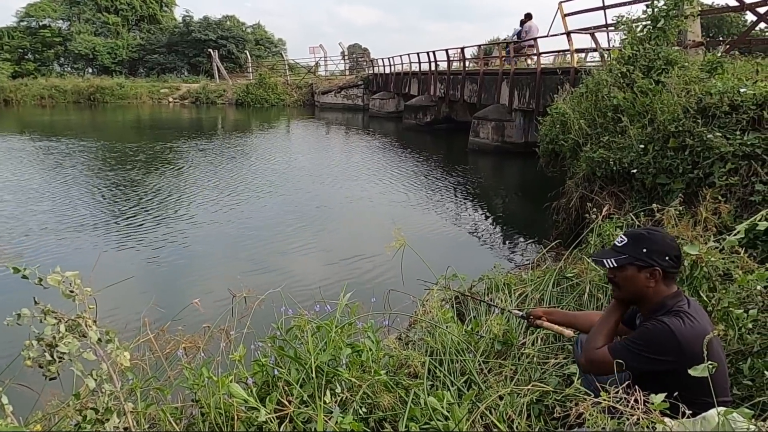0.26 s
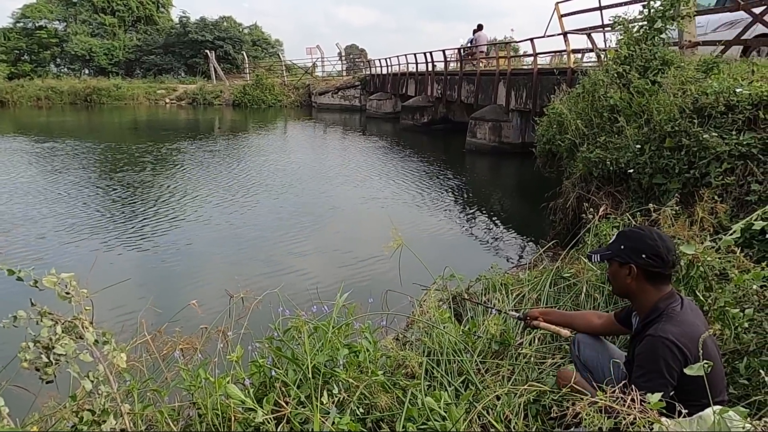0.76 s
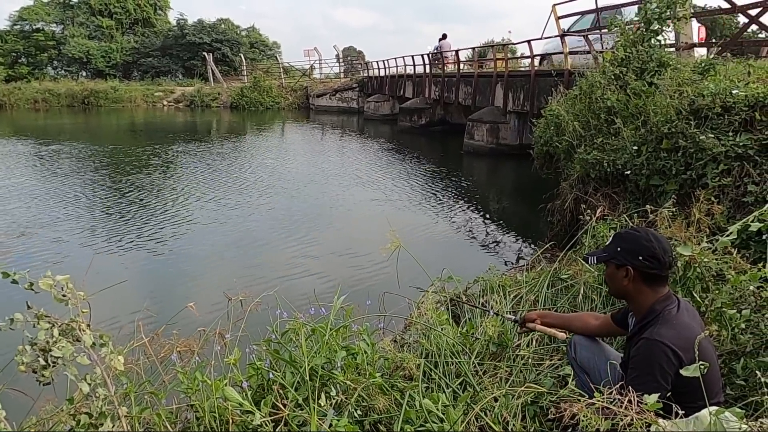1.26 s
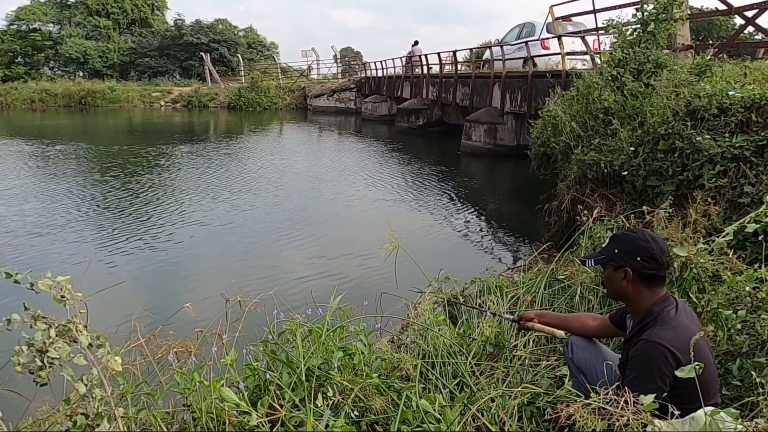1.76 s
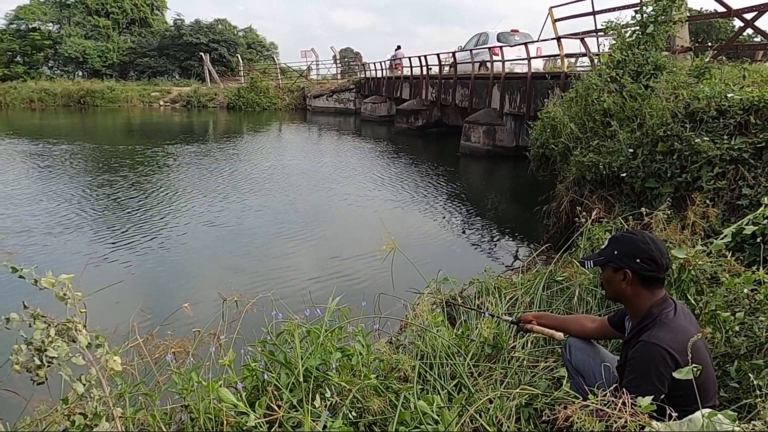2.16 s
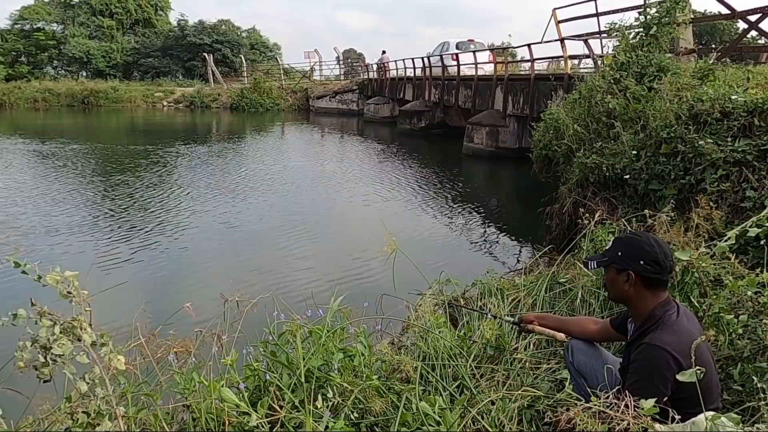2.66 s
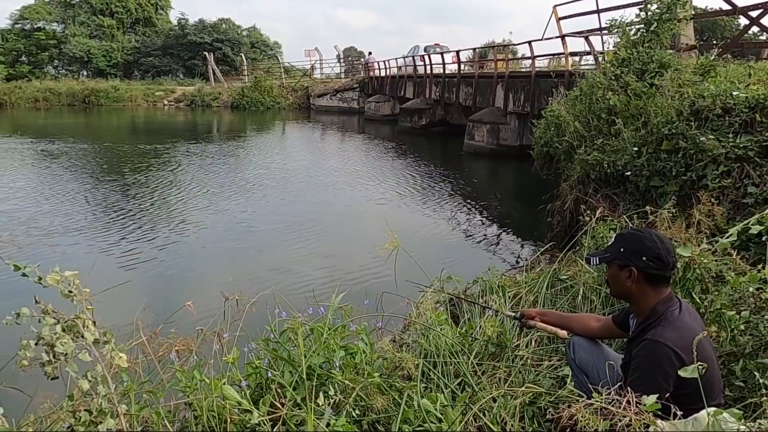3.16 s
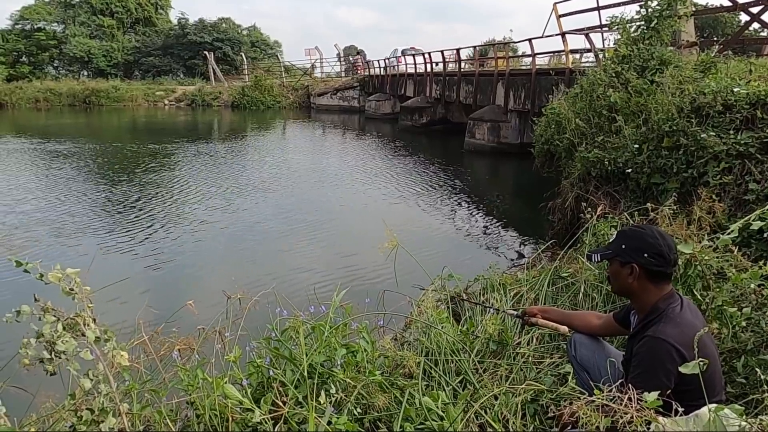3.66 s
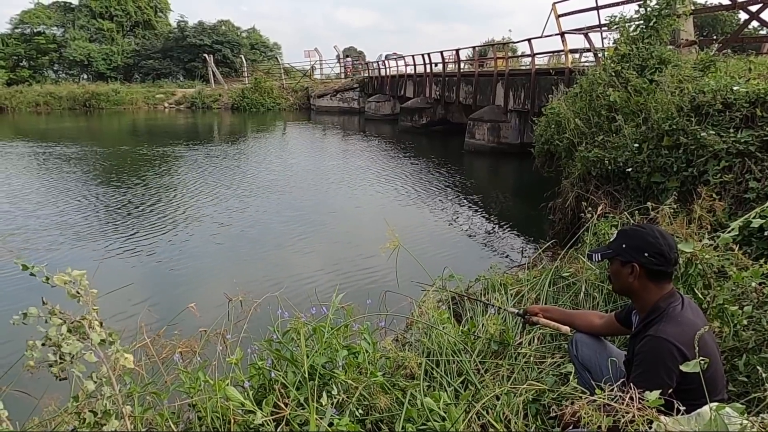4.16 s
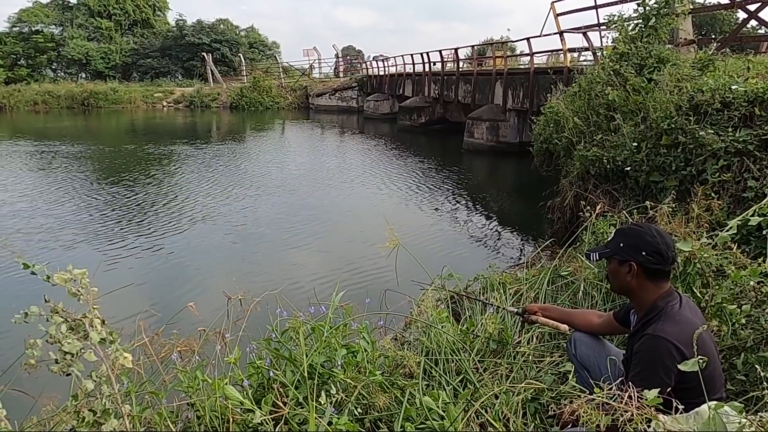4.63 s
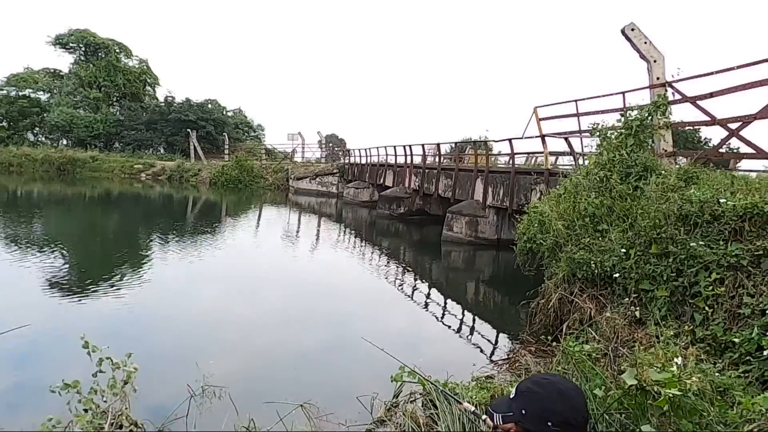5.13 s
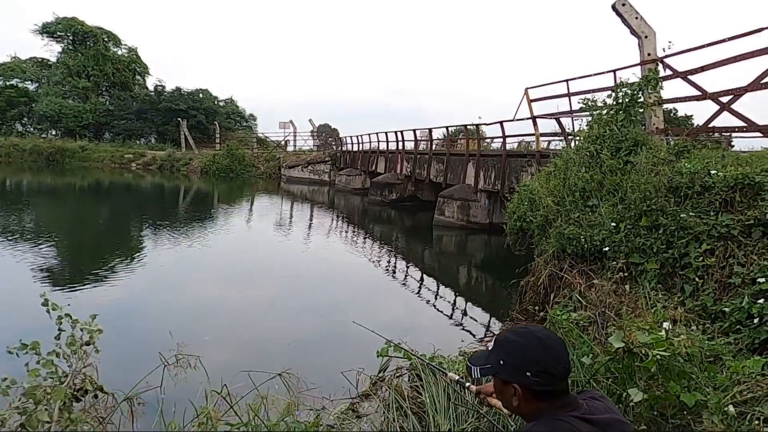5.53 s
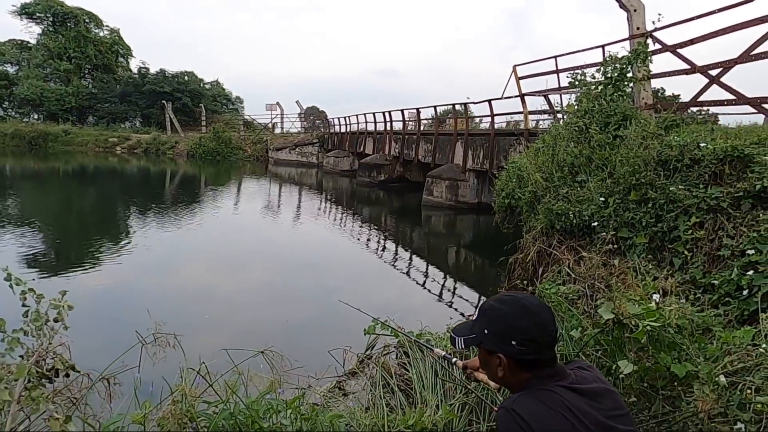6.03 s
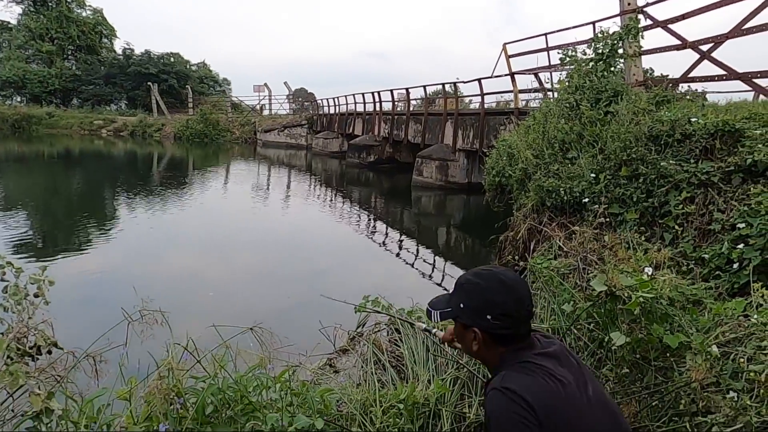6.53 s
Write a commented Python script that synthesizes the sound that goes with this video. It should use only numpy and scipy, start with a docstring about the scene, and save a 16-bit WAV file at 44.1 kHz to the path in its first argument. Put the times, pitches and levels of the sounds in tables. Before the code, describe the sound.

A motorbike and a car cross a bridge, wind buffets, then after a brief silence another motorbike thumps and slows amid small clicks.

```python
"""Traffic crosses a low bridge, heard from the grassy bank of a pond: a motorbike putters off on uneven
exhaust pulses, and a car booms up to speed behind it, its tyres roaring and singing on the deck.
Dry grass scrapes, and a gust buffets the microphone. After a short silence the scene
changes to a quieter bank: a single-cylinder bike thumps and throttles down among scraping crickets,
a far bird's trills and the clicks and rustle of fishing tackle."""
import sys
import numpy as np
from scipy import signal
from scipy.fft import rfft, irfft
from scipy.io import wavfile
from scipy.ndimage import uniform_filter1d

SR = 44100
rng = np.random.default_rng(int(sys.argv[2]) if len(sys.argv) > 2 else 0)


def put_to_file(sound):
    """Save the sound as 16-bit audio at rate SR, in the file named by the first command-line argument."""
    columns = np.atleast_2d(sound).T  # one column per channel
    safe = np.clip(columns, -1, 1)
    whole_steps = np.round(safe * 32767)
    wavfile.write(sys.argv[1], SR, whole_steps.astype(np.int16))


N = 299439
TIME = np.arange(N) / SR
BRIDGE_END_S, BANK_START_S, BANK_FULL_S, THROTTLE_SHUT_S = 4.981, 5.19, 5.28, 5.79

# Tone of the engines. Each row: frequency in Hz, level in dB.
BIKE_PIPE_EQ = [(20, -24), (50, -0.5), (80, -0.5), (105, 3), (130, -1), (156, 2), (200, -10), (235, -14.5),
                (280, -31), (340, -29), (700, -44.5), (3000, -87)]
BIKE_CLATTER_EQ = [(60, -10.5), (100, 0.5), (220, 0.5), (320, -14.5), (600, -9.5), (900, -12.5),
                   (1600, -12.5), (2100, -29.5), (3500, -22), (5000, -31.5), (9000, -35.5), (11500, -50),
                   (12600, -46), (16000, -62)]
CAR_PUFF_EQ = [(60, -18.5), (160, 6), (210, -5.5), (250, -7), (320, -18.5), (480, -8.5), (800, -24),
               (3000, -62)]
OPEN_THROTTLE_EQ = [(15, -40), (45, -3.5), (80, 0.5), (135, 3), (175, -7.5), (215, 0.5), (265, -16.5),
                    (315, -3), (390, -32), (700, -40), (2000, -80.5), (6000, -100)]
SHUT_THROTTLE_EQ = [(15, -21.5), (32, -2), (55, 4), (120, -3), (170, -8), (215, -14), (300, -23),
                    (420, -39.5), (700, -46), (2000, -74), (6000, -100)]
# The car's revs. Each row: time in seconds, firings per second, boom in dB, its octave in dB.
CAR_REVS = [(0, 28.5, -37, -35), (.8, 29.9, -36.5, -37), (1.24, 30.3, -37, -44), (1.32, 36.3, -32, -37),
            (1.42, 39.7, -27.5, -37.5), (1.58, 43, -24.5, -31), (1.96, 44.6, -24.5, -28),
            (2.2, 46.2, -24.5, -35), (2.36, 45, -28.5, -30.5), (2.44, 40, -31.5, -39),
            (2.68, 40, -29.5, -36.5), (2.83, 39.5, -42.5, -43), (3.0, 39.4, -38, -37.5),
            (3.5, 42, -32, -34), (3.98, 45.2, -32.5, -40), (4.22, 47, -37, -38.5), (4.5, 44.5, -30.5, -41),
            (4.7, 45.5, -37, -49), (4.98, 46, -38, -44.5)]
# Its overtones at the lowest revs. Each row: harmonic number, level in dB against the octave.
CAR_OVERTONES = [(3, -2), (4, -12), (5, -9.5), (6, -11)]
# Tone of the tyres and the traffic bed. Each row: frequency in Hz, level in dB.
ROAR_EQ = [(150, -7.5), (300, -2.5), (450, 4), (650, -2), (850, -4.5), (1200, -5.5), (1700, -9),
           (2500, -13.5), (3500, -19), (6000, -45.5), (12000, -69)]
RASP_EQ = [(600, -26.5), (1300, -9.5), (1750, -1), (1950, -4.5), (2200, 5), (2420, -7), (2650, 0),
           (3000, -11.5), (3600, -6), (5000, -18), (9000, -42)]
RUSH_EQ = [(600, -28), (880, 5), (1150, 4), (1350, -9), (1650, 1), (1950, -20), (4000, -44)]
HISS_EQ = [(1000, -15), (2500, -13), (3800, 1), (5200, -1), (6800, -11), (8700, -8), (9800, -18),
           (11000, -31), (13200, -33.5), (16000, -46.5)]
RUMBLE_EQ = [(10, -9.5), (28, 0.5), (55, 4.5), (100, -4.5), (180, -11.5), (250, -18), (400, -38.5),
             (1000, -67.5), (5000, -100)]
# Hollow, boxy resonances that colour the tyre roar.
# Each row: centre in Hz, width in Hz, boost or cut in dB at depth 1.
HOLLOW_BANDS = [(481, 21, 4.5), (780, 138, -6.5), (996, 73, 5), (1602, 58, 4.5), (1890, 99, -2),
                (2150, 46, 1.5), (327, 101, -6.5)]
# They deepen partway through the pass. Each row: time in seconds, depth as a factor.
HOLLOW_DEPTH = [(0, 0.23), (2.4, 0.9), (2.7, 1.28), (4.98, 0.95)]
# The tread's song. Each row: time in seconds, pitch in Hz, level in dB.
TREAD_SONG = [(0, 995, -56), (.35, 989, -70), (.55, 956, -54), (.85, 975, -50), (1.15, 996, -61),
              (1.45, 1002, -50.5), (1.9, 1007, -53.5), (2.55, 1038, -53.5), (2.7, 1085, -48),
              (2.85, 1060, -53), (3.3, 1040, -50.5), (3.7, 1016, -55), (4.28, 1020, -56),
              (4.38, 1040, -54.5), (4.5, 1010, -60), (4.98, 1000, -60)]
# Swells of tyre rasp, grass and handling. Each row: middle in seconds, width in seconds, level in dB.
RASP_SWELLS = [(1.6, 0.26, -58.5), (2.15, 0.2, -56), (4.7, 0.2, -60.5)]
GRASS_SWELLS = [(1.205, .015, -59), (2.69, .012, -58.5), (2.768, .014, -60), (3.219, .003, -56),
                (4.587, 0.0039, -54)]
RUSTLE_SWELLS = [(5.28, 0.033, -56.5), (5.333, 0.0092, -60), (6.672, 0.0088, -56.5), (6.735, 0.029, -55)]
# Tone of the sounds on the bank. Each row: frequency in Hz, level in dB.
GRASS_EQ = [(1500, -19), (2800, 0), (3600, 3.5), (4300, -2), (5100, 1), (6000, -12), (7200, -17),
            (9000, -26), (12000, -45)]
BREEZE_EQ = [(10, -8.5), (30, 7), (55, -3), (100, -7), (180, -21.5), (300, -31), (1000, -78.5)]
BANK_EQ = [(15, -21.5), (45, -0.5), (120, 7), (220, -6), (320, -16.5), (400, -16.5), (500, -15), (750, -24),
           (1100, -29.5), (1500, -32.5), (2200, -39), (3300, -48), (4500, -49), (9000, -63.5),
           (16000, -100.5)]
CLICK_EQ = [(300, -8), (900, -1), (1600, 2), (2300, 2.5), (2900, -2), (3900, 6.5), (4800, -5), (6000, -2.5),
            (8000, -18), (10000, -25), (12000, -49), (16000, -62)]
RUSTLE_EQ = [(300, -13), (800, -6), (1600, 0.5), (2600, -1.5), (4000, -2), (5500, -7), (8000, -9),
             (10000, -19.5), (12000, -32), (16000, -43)]
INSECT_EQ = [(3000, -30.5), (4700, -11), (5400, -10.5), (6300, 6), (7200, 4.5), (7900, -11),
             (8600, -4.5), (10000, -30.5), (15000, -37.5)]
# Wind hitting the microphone. Each row: middle in seconds, length in seconds, level in dB,
# eddy frequency in Hz, share at the right port from 0 to 1.
WIND_PUFFS = [(2.429, 0.042, -34.5, 70, 0.3), (2.563, 0.06, -34.5, 131, 0.26),
              (2.879, 0.077, -31.5, 119.9, 0.37), (2.945, .11, -29, 50, 0.47),
              (3.539, 0.091, -26.5, 48.13, 0.28), (3.639, .16, -29.5, 65, 0.7), (3.79, 0.086, -34, 65, 0.3),
              (4.241, .09, -33, 70, 0.8), (4.324, 0.036, -24, 91.2, 0.1), (4.338, 0.013, -23, 337, 1),
              (4.346, 0.04, -18, 65.8, 0.99), (4.362, .03, -18, 123, 0.8), (4.3806, 0.039, -15.5, 280, 1),
              (4.388, .018, -28.5, 420, 0.98), (4.403, .04, -22.5, 166, 1), (4.419, .028, -22, 114.3, 1),
              (4.44, 0.033, -27, 210, 1), (4.472, .05, -25, 190, 0.96), (4.495, .026, -27, 267, 0.99),
              (4.498, .028, -20, 90, 1), (4.538, .035, -28.5, 247, 0.99), (4.557, 0.07, -26.5, 112, 1),
              (4.961, 0.067, -30.5, 110.9, 0.6)]
# Slapback of the thumps. Each row: delay in seconds, its growth in seconds per second, level in dB.
THUMP_ECHOES = [(.003, 0.01386, -12.5), (0.0212, 0.00935, -12), (.037, .001, -10.5)]
# Cricket and bird calls. Each row: start in seconds, length in seconds, pitch in Hz, level in dB.
CRICKET_BOUTS = [(5.307, .35, 7470, -69.5), (5.655, .49, 7670, -78.5), (6.006, .77, 7460, -74)]
BIRD_TRILLS = [(5.428, 0.28, 4890, -73.5), (5.468, 0.2, 4540, -79), (5.99, 0.2, 4600, -81),
               (6.139, 0.25, 4920, -76), (6.562, 0.08, 4660, -78)]
# Knocks of tackle. Each row: start in seconds, crack peak in dB, crack T60 in seconds,
# ring pitch in Hz, ring level in dB, ring T60 in seconds.
TACKLE_CLICKS = [(5.232, -32, 0.006, 3430, -59, .02), (5.253, -45, .008, 4000, -62, .02),
                 (5.2703, -33.5, 0.038, 725, -31.5, 0.053), (5.282, -37, 0.013, 2900, -57, .04),
                 (5.286, -26.5, 0.017, 820, -31, 0.081), (5.311, -55, .02, 4530, -63, .04),
                 (5.334, -25.5, 0.018, 2260, -32, .038), (6.657, -36.5, 0.007, 5630, -66, .02),
                 (6.725, -48, 0.037, 1670, -50, 0.045), (6.746, -55, .04, 1280, -49, .05),
                 (6.761, -49, .006, 4100, -64, .03), (6.78, -55, 0.016, 2420, -50, .045)]
# Stereo image of the noise beds. Each row: frequency in Hz, left-right likeness from 0 to 1.
AIR_LIKENESS = [(60, 0.86), (120, 1), (260, 0.94), (530, 0.97), (1090, 0.93), (2250, 0.81), (4640, 0.6),
                (9580, 0.21)]
BREEZE_LIKENESS = [(20, 0.2), (300, 0.2)]
RUMBLE_LIKENESS = [(20, 0.85), (300, 1)]
# Stereo width of the bridge. Each row: time in seconds, side gain in dB.
BRIDGE_WIDTH = [(0, -39), (.3, -36), (.55, -17), (1.2, -7), (2.2, -1.5), (4.5, -0.5), (4.7, -11.5),
                (4.98, -12)]


def gain_of(db):
    """Decibels to amplitude."""
    return 10 ** (np.asarray(db) / 20)


def unit_rms(x):
    """Scales to rms 1."""
    return x / np.sqrt(np.mean(x ** 2) + 1e-20)


def at_hz(points, hz):
    """Reads a table along a log-frequency axis."""
    f, value = np.transpose(points)
    return np.interp(np.log(hz + 1), np.log(f + 1), value)


def curves(rows):
    """The columns of a time table, sample by sample."""
    s, *columns = np.transpose(rows)
    return [np.interp(TIME, s, c) for c in columns]


def bell(x, centre, width):
    """A smooth rise and fall of height 1."""
    return np.exp(-.5 * ((x - centre) / width) ** 2)


def swells(rows):
    """An envelope of bell-shaped swells."""
    return sum(gain_of(db) * bell(TIME, s, width) for s, width, db in rows)


def since(s):
    """Seconds gone by after time s, zero before it."""
    return np.maximum(TIME - s, 0)


def phase(hz):
    """The running angle of a moving pitch."""
    return 2 * np.pi * np.cumsum(hz) / SR


def add(mix, s, sound):
    """Lays a sound into the mix at time s."""
    part = mix[..., round(s * SR):][..., :sound.shape[-1]]
    part += sound[..., :part.shape[-1]]


def drift(rate_hz):
    """A smooth random wobble of rms 1."""
    lowpass = np.exp(-(np.fft.rfftfreq(N, 1 / SR) / rate_hz) ** 2)
    return unit_rms(irfft(rfft(rng.standard_normal(N)) * lowpass, N))


def impulse(eq, size=8192):
    """The minimum-phase impulse response of an EQ curve, peak 1."""
    log_gain = np.log(gain_of(at_hz(eq, abs(np.fft.fftfreq(size, 1 / SR)))))
    response = np.fft.ifft(np.exp(signal.hilbert(log_gain).conj())).real[:size // 2]
    return response / abs(response).max()


def through(x, response):
    """Convolution, cut to the scene's length."""
    return signal.oaconvolve(x, response)[:N]


def firings(turns):
    """One unit impulse at each whole turn."""
    return np.diff(np.floor(turns), prepend=np.floor(turns[0]))


def noise(eq, patchy_db, hollows=(), likeness=AIR_LIKENESS, size=1024):
    """Stereo noise of rms 1, shaped by an EQ, drifting patches and optional hollow bands."""
    hop = size // 4
    frames, hz = N // hop + 5, np.fft.rfftfreq(size, 1 / SR)
    a, b, c, d, patches = rng.standard_normal((5, frames, len(hz)))
    patches = uniform_filter1d(uniform_filter1d(patches, size=9, axis=0), size=12, axis=1)
    field_db = at_hz(eq, hz) + patchy_db * unit_rms(patches)
    depth = np.interp(np.arange(frames) * hop / SR, *np.transpose(HOLLOW_DEPTH))[:, None]
    for centre, width, db in hollows:
        field_db += depth * db * bell(hz, centre, width)
    same = at_hz(likeness, hz)
    left = a + 1j * b
    right = same * left + np.sqrt(1 - same ** 2) * (c + 1j * d)
    spectra = np.array([left, right]) * gain_of(field_db)
    return unit_rms(signal.istft(spectra.swapaxes(1, 2), nperseg=size, noverlap=size - hop)[1][:, :N])


def reverb(x, t60, wet_db):
    """Adds the diffuse return from banks and trees."""
    t = TIME[:SR // 2]
    tail = rng.standard_normal(len(t)) * gain_of(-60 * t / t60) * (t > .012)
    return x + gain_of(wet_db) * through(x, tail / np.linalg.norm(tail))


def narrowed(pair, side_db):
    """Turns down what differs between left and right."""
    middle = pair.mean(0)
    return middle + gain_of(side_db) * (pair - middle)


def motorbike(rate_hz=26, level_db=-31.5, fade_db_per_s=3, bark_hz=245, bark_t60=0.061):
    """Uneven exhaust pulses draw away; their bark and the throbbing clatter are lost sooner."""
    turns = np.cumsum(rate_hz * (1 + 0.0091 * drift(11.9))) / SR
    away_db = -fade_db_per_s * TIME
    pulses = firings(turns) * gain_of(2.5 * drift(26))
    exhaust = unit_rms(reverb(through(pulses, impulse(BIKE_PIPE_EQ)), t60=0.18, wet_db=-1.5))
    clatter = noise(BIKE_CLATTER_EQ, patchy_db=2.5) * (1 + 0.14 * np.cos(2 * np.pi * turns))
    t = TIME[:SR // 10]
    ping = gain_of(-60 * t / bark_t60) * np.sin(2 * np.pi * bark_hz * t)
    bark = unit_rms(through(pulses, ping)) * gain_of(-39 - 25 * TIME)
    engine = exhaust * gain_of(away_db) + clatter * gain_of(-10 + 2.7 * away_db)
    return bark + gain_of(level_db) * engine


def car(labour_db_per_hz=1.5, puff_db=-21, sharpness=0.94):
    """A slow engine booms and puffs at each firing, richest in overtones as it labours at low revs."""
    rate, boom_db, octave_db = curves(CAR_REVS)
    angle = phase(rate)
    overtones = sum(gain_of(db + 2 * drift(1.4)) * np.sin(k * angle) for k, db in CAR_OVERTONES)
    upper = np.sin(2 * angle) + overtones * gain_of(-labour_db_per_hz * (rate - rate.min()))
    boom = gain_of(boom_db) * np.sin(angle) + gain_of(octave_db) * upper
    pulsing = unit_rms(np.exp(sharpness * np.cos(angle - np.pi / 3)))
    puffs = noise(CAR_PUFF_EQ, patchy_db=1)[0] * pulsing
    return np.sqrt(2) * boom * gain_of(0.53 * drift(24)) + gain_of(boom_db + puff_db) * puffs


def road(nearest_s=1.6, pass_width_s=2.4, onto_bridge_s=0.54, flutter_db=0.84):
    """Tyres rush onto the deck, then roar, rasp and hiss past, over a low bed of traffic rumble."""
    distance = np.hypot(1, (TIME - nearest_s) / pass_width_s)
    roar = gain_of(-46) / distance * noise(ROAR_EQ, patchy_db=1, hollows=HOLLOW_BANDS)
    rasp = swells(RASP_SWELLS) * noise(RASP_EQ, patchy_db=2.5)
    rush = gain_of(-52.5) * bell(TIME, onto_bridge_s, width=0.14) * noise(RUSH_EQ, patchy_db=5.5)
    hiss = gain_of(-59 - 1.77 * TIME) * noise(HISS_EQ, patchy_db=1.5)
    rumble = gain_of(-39) * noise(RUMBLE_EQ, patchy_db=-0.5, likeness=RUMBLE_LIKENESS, size=4096)
    return (roar + rush + rasp + hiss) * gain_of(flutter_db * drift(44)) + rumble


def tread(width_hz=125, spread_db=-10):
    """The tyre tread sings in a narrow band of noise that shifts and swells along the deck."""
    hz, level_db = curves(TREAD_SONG)
    angle = phase(hz)
    bands = [drift(width_hz) * np.cos(angle) + drift(width_hz) * np.sin(angle) for _ in range(3)]
    centre, sides = bands[0], np.array(bands[1:])
    return gain_of(level_db) * unit_rms(centre + gain_of(spread_db) * sides)


def faint_high_tone(hz=12290, waver_hz=32, level_db=-97.5):
    """A very thin, wavering high tone, too faint to hear."""
    return gain_of(level_db) * unit_rms(np.sin(phase(hz + waver_hz * drift(90))))


def grass(grain_db=4.5):
    """Dry stems scrape in brief, grainy strokes close by."""
    friction = noise(GRASS_EQ, patchy_db=3, size=256) * gain_of(grain_db * drift(200))
    return swells(GRASS_SWELLS) * unit_rms(friction)


def gust(kick_db=2.5, swirl_db=-0.5, steepness=3.34):
    """Each puff is a pressure kick in a low swirl, shared unevenly by the microphone's two ports."""
    out, hz = np.zeros((2, N)), np.fft.rfftfreq(SR, 1 / SR)
    for s, length, db, eddy_hz, right in WIND_PUFFS:
        window = np.hanning(round(length * SR))
        u = (np.pi * eddy_hz * (TIME[:len(window)] - length / 2)) ** 2
        kick = gain_of(kick_db) * (1 - 2 * u) * np.exp(-u) * window
        colour = hz / (hz + eddy_hz) / np.sqrt(1 + (hz / eddy_hz) ** (2 * steepness))
        for port, share in zip(out, [1 - right, right]):
            turbulence = irfft(np.exp(2j * np.pi * rng.random(len(hz))) * colour)
            swirl = gain_of(swirl_db) * unit_rms(turbulence[:len(window)] * window)
            add(port, s - length / 2, np.sqrt(share) * gain_of(db) * (kick + swirl))
    return out


def breeze(peak_s=4.03, width_s=0.38, level_db=-31.5):
    """One slow swell of wind, a different rumble at each port."""
    rumble = noise(BREEZE_EQ, patchy_db=4.5, likeness=BREEZE_LIKENESS, size=2048)
    return gain_of(level_db) * bell(TIME, peak_s, width_s) * rumble


def bank_ambience(traffic_db=-32, ebb_db_per_s=6, insects_db=-70.5):
    """Traffic noise ebbs under a steady, high haze of insects."""
    traffic = noise(BANK_EQ, patchy_db=0.77, size=2048)[0]
    insects = narrowed(noise(INSECT_EQ, patchy_db=-3), side_db=-23.5)
    ebb = gain_of(traffic_db - ebb_db_per_s * since(BANK_START_S))
    return ebb * traffic + gain_of(insects_db) * insects


def thumper(rate_hz=16.36, slowing_hz_per_s=9.8, first_thump_s=5.2112, coast_s=0.12, fade_db_per_s=25):
    """A single cylinder thumps through its pipe, then dulls, slows and fades once the throttle shuts."""
    turns = np.cumsum(rate_hz - slowing_hz_per_s * since(THROTTLE_SHUT_S)) / SR
    misfire = bell(TIME, 5.835, width=.018)  # one weak, late firing as the throttle shuts
    stumble = 0.0056 * drift(17) - 0.2 * misfire
    throttle = np.interp(since(THROTTLE_SHUT_S), [0, 0.053], [0.94, 0.075])
    beats = firings(turns + stumble - np.interp(first_thump_s, TIME, turns))
    level_db = -15.5 - fade_db_per_s * since(THROTTLE_SHUT_S + coast_s) - 6 * misfire
    pulses = beats * gain_of(level_db + 0.5 * drift(26))
    direct = through(pulses * throttle, impulse(OPEN_THROTTLE_EQ))
    direct += through(pulses * (1 - throttle), impulse(SHUT_THROTTLE_EQ))
    # The echoes lag further as the bike moves on.
    echoes = sum(gain_of(db) * np.interp(TIME - delay - growth * since(BANK_START_S), TIME, direct)
                 for delay, growth, db in THUMP_ECHOES)
    return reverb(direct + echoes, t60=0.36, wet_db=-20.5) + engine_ring(beats, throttle)


def engine_ring(beats, throttle, open_hz=982, shut_hz=994, open_rise_s=0.016, shut_rise_s=0.0092):
    """A thin ring follows the thumps: nearly steady under power, separate, higher pings when coasting."""
    t = TIME[:SR // 4]
    swell = sum(through(beats * share, t / rise * np.exp(-t / rise) / np.sqrt(rise))
                for share, rise in [(throttle, open_rise_s), (1 - throttle, shut_rise_s)])
    hz = shut_hz + (open_hz - shut_hz) * throttle + 7.4 * drift(65)
    ring = unit_rms(swell * gain_of(2.7 * drift(25)) * np.sin(phase(hz)))
    fade_in = np.clip(since(BANK_START_S) / 0.32, 0, 1)
    return ring * fade_in * gain_of(-57 - 10.5 * since(THROTTLE_SHUT_S))


def tackle(rattle_rad=0.38):
    """Each click is a short crack and the rattling ring of the part that was knocked."""
    out, t, colour = np.zeros(N), TIME[:SR // 8], impulse(CLICK_EQ)
    looseness = rattle_rad * drift(260)
    for s, db, crack_t60, hz, ring_db, ring_t60 in TACKLE_CLICKS:
        burst = rng.standard_normal(len(t)) * gain_of(-60 * t / crack_t60)
        crack = through(burst, colour)[:len(t)]
        rattle = np.roll(looseness, -round(s * SR))[:len(t)]
        ring = gain_of(ring_db - 60 * t / ring_t60) * np.sin(2 * np.pi * hz * t + rattle)
        add(out, s, gain_of(db) * crack / abs(crack).max() + ring)
    return reverb(out, t60=0.08, wet_db=-18.5)


def rustle(grain_db=1.5):
    """Stems and cloth rub in clumped grains as the tackle is handled."""
    friction = noise(RUSTLE_EQ, patchy_db=2.5, size=512)[0] * gain_of(grain_db * drift(300))
    return swells(RUSTLE_SWELLS) * unit_rms(friction)


def crickets(period_s=.1395, stroke_s=0.031, spacing_s=.037, arch_hz=190):
    """Crickets scrape evenly spaced chirps, each two strokes that arch in pitch."""
    out = np.zeros(N)
    u = np.linspace(-1, 1, round(stroke_s * SR))
    for start, length, hz, db in CRICKET_BOUTS:
        stroke = gain_of(db) * unit_rms(np.cos(np.pi * u / 2) * np.sin(phase(hz - arch_hz * u ** 2)))
        for s in np.arange(start, start + length, period_s):
            add(out, s, stroke)
            add(out, s + spacing_s, stroke)
    return reverb(out, t60=.1, wet_db=-13)


def bird(notes_per_s=54, sweep_hz=220, rasp_hz=150):
    """A small, far bird trills in quick, raspy falling sweeps."""
    out = np.zeros(N)
    for s, length, hz, db in BIRD_TRILLS:
        cycle = TIME[:round(length * SR)] * notes_per_s % 1
        pitch = hz + sweep_hz * (1 - 2 * cycle) + rasp_hz * drift(400)[:len(cycle)]
        notes = np.sin(np.pi * cycle) ** 2 * np.sin(phase(pitch))
        add(out, s, gain_of(db) * unit_rms(notes * signal.windows.tukey(len(cycle), .6)))
    return reverb(out, t60=.2, wet_db=-0.5)


def scene():
    """The busy bridge stops dead; after a short silence the bank fades in, almost mono."""
    left, right = motorbike() + car() + road() + tread() + grass() + faint_high_tone()
    pair = np.array([np.roll(left, 1), right])  # left ear a sample late: the bridge is a little right
    bridge = narrowed(pair, side_db=curves(BRIDGE_WIDTH)[0]) + breeze() + gust()
    bank = bank_ambience() + thumper() + bird() + crickets() + tackle() + rustle()
    cut_off = np.clip((BRIDGE_END_S - TIME) / 0.0011, 0, 1)
    fade_in = np.sin(np.interp(TIME, [BANK_START_S, BANK_FULL_S], [0, np.pi / 2])) ** 2
    return bridge * cut_off + bank * fade_in


def record(dry):
    """A steep low-pass trims the very top of the mix."""
    lowpass = signal.firwin(511, cutoff=15600, window=("kaiser", 9), fs=SR)
    return signal.oaconvolve(dry, lowpass[None], "same")


dry = scene()
out = record(dry)
put_to_file(out)
```